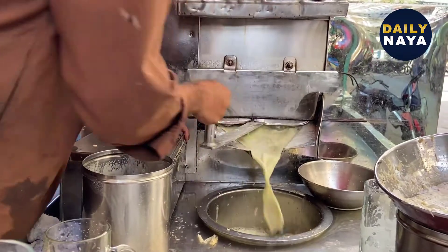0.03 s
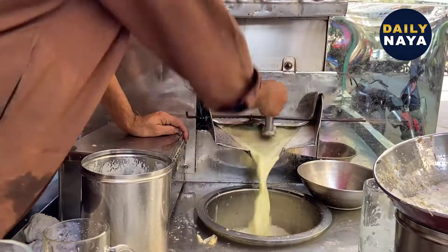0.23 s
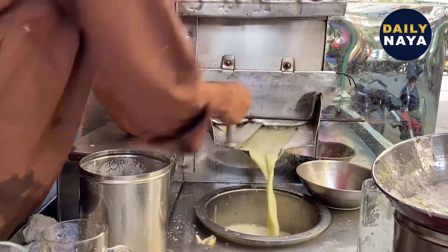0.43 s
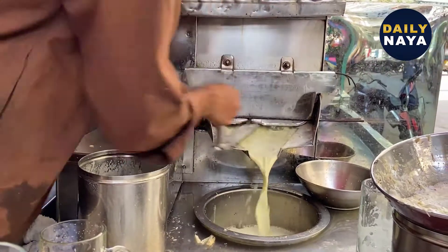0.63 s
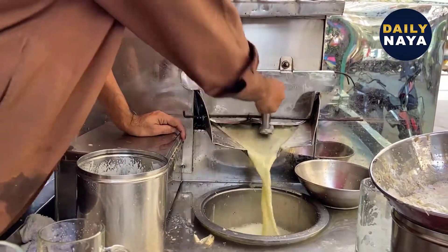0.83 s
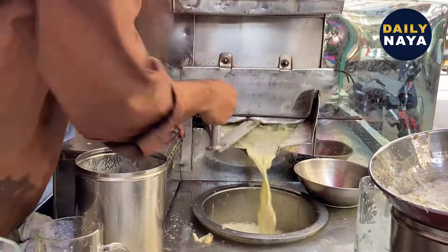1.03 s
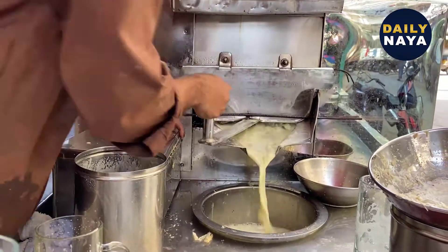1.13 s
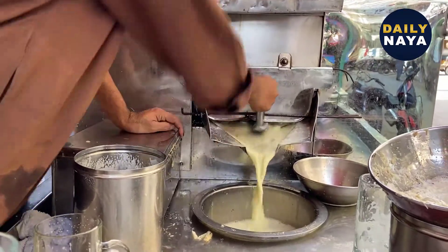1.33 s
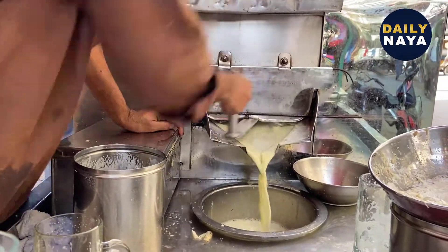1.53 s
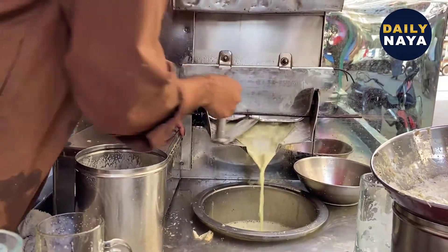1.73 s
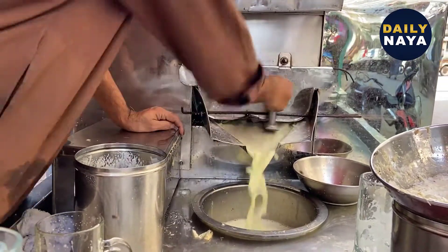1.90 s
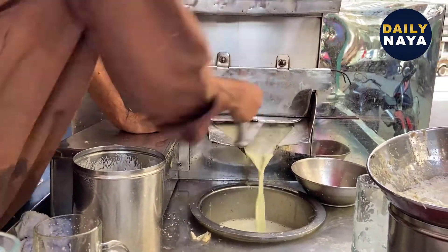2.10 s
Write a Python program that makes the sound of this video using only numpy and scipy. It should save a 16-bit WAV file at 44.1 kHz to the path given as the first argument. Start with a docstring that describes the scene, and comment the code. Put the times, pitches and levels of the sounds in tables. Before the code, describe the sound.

Metal scraping on a hollow sheet-metal tray, close and dry. A gritty rasp opens and fades by 0.1 s; a dull clunk at 0.23, a ringing crack at 0.6, faint squeaks to 0.9. At 1.11 a crack leads into the loudest, clipped clanging scrape near 1.16. Lighter scrapes and thin high whistles follow, a bright clank at 1.72, a squeak and booming thuds around 1.9, then fading rubs over low street murk.

```python
"""Street stall: a hand sweeps a metal scraper to and fro along the wet sheet-metal tray of a cane press. Dense
friction grains ring tray and scraper; coarser judders shake the hollow below into rumble and boom. Noise bursts
make knocks and clunks, single blows make catches and thuds, gliding tones squeak and whistle. Patchy band noise
is the murky street-and-machine floor. The loudest peaks clip."""
import sys
import numpy as np
from scipy import signal
from scipy.io import wavfile

SR = 44100
rng = np.random.default_rng(int(sys.argv[2]) if len(sys.argv) > 2 else 0)


def master(y):
    """Save y as 16-bit WAV."""
    cut = np.clip(np.atleast_2d(y).T, -1, 1)
    pcm = np.round(cut * 32767)  # scale
    wavfile.write(sys.argv[1], SR, pcm.astype(np.int16))


N = 95300

# shared resonances: (centre [Hz], width [Hz], relative gain [dB])
# scraper blade
SCRAPER_MODES = [(4652, 370, 1), (4930, 300, 6.5), (5277, 205, 5), (5560, 230, -2), (5860, 150, -25)]
# treble hiss
TREBLE_MODES = [(10490, 520, 0), (10830, 460, 0.5), (11620, 400, 5), (12050, 130, 4), (12350, 200, 5),
                (13500, 130, -16), (13520, 1300, 3), (14170, 510, 8), (14800, 450, 1), (15020, 360, 6)]
# drumming of the hollow under the tray
DRUMMING_MODES = [(280.7, 63, 6.5), (339, 28.5, 2.5), (402.4, 91, 2.5), (505, 115, -6)]
# low mids of the same hollow
LOW_MID_MODES = [(565.5, 124, 2.5), (672.7, 106, 5), (784, 83, 1), (839, 81, -3), (946, 127, -6)]
WANDER_DB, HOLLOW_WANDER_DB, WANDER_HZ = 2.2, 1.5, 15


def amp(db):
    """dB to gain."""
    return 10 ** (np.asarray(db) / 20)


def rms_one(x):
    """Scale to rms 1."""
    return x / np.sqrt(np.mean(x ** 2) + 1e-20)


def in_time(rows):
    """Interpolate the columns of a time table to every sample."""
    time_s, *columns = np.transpose(rows)
    return [np.interp(np.arange(N) / SR, time_s, column) for column in columns]


def drift(rate_hz):
    """Random drift of rms 1: noise low-passed near rate_hz by a double pole."""
    step = 40  # samples per drift point
    pole = np.exp(-2 * np.pi * rate_hz * step / SR)
    noise = rng.standard_normal(N // step + 2002)
    slow = signal.lfilter([1], [1, -2 * pole, pole * pole], noise)[2000:]  # settled part
    return np.interp(np.arange(N) / step, np.arange(len(slow)), rms_one(slow))


def resonate(x, hz, width_hz):
    """Two-pole resonance applied twice, for dark valleys between modes."""
    r = np.exp(-np.pi * width_hz / SR)
    poles = [1, -2 * r * np.cos(2 * np.pi * hz / SR), r * r]
    section = [(1 - r * r) / 2, 0, (r * r - 1) / 2, *poles]
    return signal.sosfilt([section, section], x + 1e-18)


def grains(per_s, spread_db):
    """Friction slips: randomly timed clicks of uneven size and either sign, rms 1."""
    sizes = amp(spread_db * np.minimum(rng.exponential(1, N), 5))
    signs = rng.choice([-1, 1], N)
    return rms_one(sizes * signs * (rng.random(N) < per_s / SR))


def ring_modes(source, modes):
    """Parallel resonances with alternating sign."""
    return [amp(db) * (-1) ** k * resonate(source, hz, width_hz)
            for k, (hz, width_hz, db) in enumerate(modes)]


def rubbed(source, level_db, modes, wander_db=WANDER_DB):
    """A source rings a set of modes, each taking a wandering share as the contact moves."""
    unlevelled = sum(ring_modes(source, modes))
    scale = np.sqrt(np.mean(unlevelled ** 2))
    parts = ring_modes(source * amp(level_db), modes)
    return sum(amp(wander_db * drift(WANDER_HZ)) * part for part in parts) / scale


def dying(events, t60_s):
    """Level [dB] of sudden blows, each falling 60 dB in t60_s; the loudest wins."""
    t = np.arange(N) / SR
    levels = [np.where(t >= s, db - 60 * (t - s) / t60_s, -200) for s, db in events]
    return np.max(levels, axis=0).clip(-200)


def struck(start_s, hz, width_hz, peak_db):
    """One resonance set ringing by a single blow."""
    click = np.zeros(N)
    click[int(start_s * SR)] = 1
    ring = resonate(click, hz, width_hz)
    return amp(peak_db) * ring / np.abs(ring).max()


def wavering_tone(hz, waver_hz):
    """Narrow-band noise: a carrier whose two quadratures drift independently."""
    phase = 2 * np.pi * np.cumsum(hz) / SR
    return drift(waver_hz) * np.cos(phase) + drift(waver_hz) * np.sin(phase)


def street():
    """Patchy far noise in half-octave bands, each drifting in level."""
    level_db, patchy_db, patchy_hz = -41, 4, 4.2
    # spectrum shape: (frequency [Hz], relative density [dB per Hz])
    spectrum = [(15, -52), (25, -28), (113, -0.5), (198, 5.5), (664, -12.5), (1050, -5), (1610, -11),
                (2110, -9.5), (3520, -12.5), (4990, -42), (6030, -6.5), (9260, -65), (12500, -43),
                (15400, -41)]
    hz, density_db = np.transpose(spectrum)
    edges_hz = 22 * 2 ** np.arange(0, 9.6, .5)
    white = rng.standard_normal((2, N))  # neighbouring bands use different noise
    out = 0
    for k, (low, high) in enumerate(zip(edges_hz, edges_hz[1:])):
        sos = signal.butter(2, [low, high], "band", fs=SR, output="sos")
        band = signal.sosfilt(sos, white[k % 2])
        band_db = np.interp(np.log(low * high) / 2, np.log(hz), density_db)
        out = out + band * amp(band_db + patchy_db * drift(patchy_hz))
    return amp(level_db) * rms_one(out)


def hollow():
    """Coarser judders shake the hollow under the tray."""
    judders_per_s, spread_db = 1200, 2
    # levels: (time [s], rumble [dB], boom [dB], drumming [dB], low mids [dB])
    levels = [(0.0, -29, -46, -24, -34), (0.042, -49, -29.5, -37, -35.5), (0.072, -39, -37, -45, -46),
              (0.118, -49, -71, -52, -52), (0.226, -41.5, -34.5, -28.5, -43), (0.326, -36, -32.5, -46, -40),
              (0.398, -46, -41, -39.5, -47), (0.47, -35, -45, -33.5, -46), (0.544, -41, -28.5, -48, -44),
              (0.602, -35.5, -17, -24.5, -28), (0.64, -32, -29, -36.5, -46), (0.674, -40, -59, -62, -53),
              (0.704, -45, -45, -57, -50), (0.756, -40, -29, -37.5, -48.5),
              (0.83, -29.5, -28.5, -39.5, -38.5), (0.884, -47, -49, -43, -40.5),
              (0.916, -40, -42.5, -38, -44), (0.936, -53, -59, -45, -48), (1.004, -51, -45, -44, -57),
              (1.032, -38, -30, -38, -48), (1.1, -40, -20.5, -37, -38), (1.12, -37, -13, -42, -28),
              (1.146, -36, -7.5, -15, -9), (1.164, -21, -14, -3, 2.5), (1.18, -24, -28, -32, -10),
              (1.198, -42, -36, -26, -19.5), (1.23, -45, -38, -51, -38), (1.25, -52, -48, -36.5, -50),
              (1.36, -33.5, -28.5, -33, -35.5), (1.406, -42, -30, -43, -38),
              (1.444, -31.5, -33, -33.5, -45), (1.518, -60, -40, -44.5, -40.5), (1.554, -37, -61, -49, -47),
              (1.582, -42.5, -48, -38.5, -40.5), (1.636, -43, -33.5, -40, -43.5),
              (1.716, -28.5, -27, -33, -23), (1.74, -37, -37.5, -28, -24.5),
              (1.796, -38, -29.5, -38.5, -44.5), (1.896, -28, -33.5, -22, -34.5),
              (1.936, -28, -17, -21.5, -22), (1.968, -22.5, -17.5, -24.5, -23),
              (2.04, -42, -39, -35.5, -36.5), (2.116, -40.5, -45, -30.5, -51), (2.16, -48, -46, -39, -38)]
    # rumble and boom resonances: (centre [Hz], width [Hz], relative gain [dB])
    rumble_modes = [(50, 105, -12.5), (75, 41, -5), (120.6, 47, -0.5)]
    boom_modes = [(147.4, 51, -3), (194.6, 54, 7), (251, 34, -5)]
    source = grains(judders_per_s, spread_db)
    mode_sets = [rumble_modes, boom_modes, DRUMMING_MODES, LOW_MID_MODES]
    return sum(rubbed(source, db, modes, HOLLOW_WANDER_DB)
               for db, modes in zip(in_time(levels), mode_sets))


def whistles():
    """Two long thin high whistles that waver in tone and level."""
    waver_hz, break_db, break_hz = 150, 2, 30
    # per whistle: (time [s], pitch [Hz])
    pitches = [
        [(.98, 12550), (1.07, 12400), (1.33, 12250), (1.41, 12500), (2.1, 12560)],
        [(1.6, 14500), (1.9, 14300)],
    ]
    # per whistle: (time [s], level before wavering [dB])
    levels = [
        [(.95, -69), (1.0, -45), (1.07, -36.5), (1.23, -31), (1.33, -33), (1.41, -28), (1.5, -51), (1.62, -60),
         (1.8, -61), (1.88, -43), (1.95, -34.5), (2.05, -38.5), (2.1, -51)],
        [(1.25, -75), (1.38, -42), (1.5, -38), (1.62, -44), (1.85, -39.5), (2.0, -39), (2.1, -60)],
    ]
    out = 0
    for pitch, level in zip(pitches, levels):
        hz, db = in_time(pitch)[0], in_time(level)[0]
        db = db + break_db * drift(break_hz)
        out = out + amp(db) * wavering_tone(hz, waver_hz)
    return out


def squeaks():
    """Short gliding slips: a steady tone blended with a wavering one by roughness."""
    waver_hz = 90
    # slips: (start [s], length [s], start pitch [Hz], end pitch [Hz], roughness [0-1], nominal level [dB])
    slips = [(0.298, 0.064, 2960, 3180, .65, -44), (0.706, 0.057, 3250, 3250, .75, -45),
             (0.806, 0.058, 3170, 3120, .5, -40), (0.857, 0.066, 2700, 2620, .3, -35.5),
             (1.895, 0.024, 4436, 4436, .5, -25), (2.126, 0.037, 3135, 3135, .6, -41)]
    t, out = np.arange(N) / SR, 0
    for start_s, length_s, start_hz, end_hz, rough, db in slips:
        along = np.clip((t - start_s) / length_s, 0, 1)
        hz = start_hz + (end_hz - start_hz) * along
        steady = np.cos(2 * np.pi * np.cumsum(hz) / SR)
        tone = (1 - rough) * steady + rough * wavering_tone(hz, waver_hz)
        swell = np.sqrt(np.abs(np.sin(np.pi * along))) * (along < 1)
        out = out + amp(db) * swell * tone
    return out


def thuds():
    """Low blows set two boom resonances throbbing."""
    low_hz, upper_hz, width_hz, upper_db = 210, 328, 60, -4
    # blows: (time [s], peak of the low resonance [dB])
    blows = [(1.906, -11.5), (1.924, -10), (1.943, -14.5), (1.968, -11.5)]
    return sum(struck(s, low_hz, width_hz, db) + struck(s, upper_hz, width_hz, db + upper_db)
               for s, db in blows)


def catches():
    """Single blows each ring one resonance: the scraper snags and a tray or scraper resonance rings out, and
    two dull clunks give the hollow a brief pitched ring."""
    width_at_1600_hz = 113
    # clunks and snags: (time [s], pitch [Hz], peak [dB])
    rings = [(.181, 394, -24), (.231, 494, -19), (0.57, 1620, -5.5), (0.602, 1577, -2.5), (0.612, 1605, -4),
             (0.629, 1270, -10.5), (1.7225, 4730, -1)]
    return sum(struck(s, hz, width_at_1600_hz * np.sqrt(hz / 1600), db) for s, hz, db in rings)


def knocks():
    """Decaying noise: bright cracks ring scraper and treble, dull clunks ring the hollow."""
    crack_t60_s, clunk_t60_s = 0.03, 0.13
    scraper_db, treble_db = -18, -16.5
    # scraper knocking on the tray: (time [s], starting level before the two offsets above [dB])
    cracks = [(0.23, -10.5), (0.6015, 4), (0.813, -6), (1.1115, 7.5), (1.7221, 4.5)]
    # dull clunks on the tray: (time [s], starting level [dB])
    clunks = [(.18, -33.5), (.229, -21.5), (1.275, -25.5)]
    noise = rng.standard_normal(N)
    crack_db = dying(cracks, crack_t60_s)
    clunk_modes = DRUMMING_MODES[1:] + LOW_MID_MODES[:2]
    return (rubbed(noise, crack_db + scraper_db, SCRAPER_MODES)
            + rubbed(noise, crack_db + treble_db, TREBLE_MODES)
            + rubbed(noise, dying(clunks, clunk_t60_s), clunk_modes, HOLLOW_WANDER_DB))


def scrape():
    """One stream of chattering friction grains rings tray, scraper, grit and treble."""
    grains_per_s, spread_db, chatter_db, chatter_hz = 5000, 2, 1.5, 120
    # strokes: (time [s], tray ring [dB], then relative to it: lower tray [dB], upper tray [dB],
    # lower scraper [dB], scraper [dB], grit [dB], treble hiss [dB])
    strokes = [(0.0, -17, 2, -8, -16, 0, -15, -5), (0.032, -15, -4, -2.5, -1, -1.5, -11, 3),
               (0.05, -14, -3, -3.5, -6, -0.5, -14.5, -5.5), (0.08, -36, 1, -4, 0, -5, -13, 0),
               (0.102, -50, 1, -17, -26, 0, -25, -1), (0.16, -26.5, -13, -14, -19, -5.5, -29, -9),
               (0.218, -30, 2, -19, -20, -11.5, -20, -17), (0.23, -23, -4, -37, -37, -3, -23, -2),
               (0.29, -38.5, -6, -5, -15, -2.5, -23, -5), (0.318, -38.5, -20, -14, -12, -10, -28, -15),
               (0.4, -53.5, 3, -25, -14, -4, -31, -7), (0.49, -33.5, -25, -9, -17, -12, -24, -10),
               (0.536, -30.5, 0.5, -2, -15, 6.5, -12, 4.5), (0.576, -17, -13, -2.5, -15, -1.5, -11, -8),
               (0.588, -26.5, -14, -4, 3.5, 5.5, -1.5, 7), (0.61, -13, -9, -0.5, -4, -7.5, -8, -2),
               (0.634, -22, -3, -4.5, -6, -4, -18, -10.5), (0.666, -40.5, -26, 2.5, -6, -3, -15, -6),
               (0.692, -35, -22, -20, -28, -7, -28, -12), (0.73, -31, -5, -2.5, -14, -0.5, -18, -5),
               (0.776, -35.5, 2, -4, -11, 5, -36, -12), (0.822, -35, -4, -2, -6.5, 2.5, -26, -4),
               (0.87, -34.5, -25, -7.5, -15, -14, -28, -17), (0.888, -31.5, -24, -23, -33, -16, -34, -18),
               (0.918, -55.5, -5, -1, 6, -2, -6, 0), (0.992, -60, 4, -10, -13, 2, -14, 2),
               (1.064, -32.5, -2, -7, -13, -6.5, -18, -9), (1.09, -31.5, 2.5, 1, -3, 4, -6, 7),
               (1.117, -23, -0.5, -1.5, 1, 7, -5.5, 7), (1.151, 3, -9, -2, -7.5, -3, -6, -4),
               (1.167, 2.5, 9, -1, -3, -18, -10, -1.5), (1.181, -8.5, -4, -6.5, -9, -8.5, -13, -8),
               (1.199, -32.5, 4, 2, -0.5, 0, -2, 4), (1.215, -43, -6, 4, 2, 3, 3, 6),
               (1.23, -42, -6, -2, -9, 2.5, -7, 9), (1.284, -15, -9.5, -9, -14, -6, -18.5, -5.5),
               (1.306, -23.5, -9, -9, -15, -10, -19, -13), (1.332, -35.5, -19, 2, -28, 0.5, -23, -4),
               (1.348, -22, -11, -7.5, -26, -5, -31, -8), (1.384, -27.5, -18, -5, -15, -0.5, -28, -6),
               (1.416, -21, -19, -12.5, -23, -17, -26, -11), (1.462, -29.5, -15, -9.5, -45, -16, -50, -32),
               (1.504, -46, -5, -6.5, -23, -6, -25, 0), (1.628, -33.5, -23, -1.5, -27, -5.5, -27, -10.5),
               (1.692, -14, -9.5, -1.5, -11, -4.5, -19.5, -10),
               (1.745, -13.5, -15, 0.5, -2.5, -0.5, -6, -8.5), (1.766, -31, -6, 8.5, -3, -5, -11, -4),
               (1.812, -35.5, -19, 3, -11, -10, -18, -28), (1.836, -28.5, -19, 0, -25, -2, -30, -20),
               (1.856, -29, -29, 6.5, -18, -4.5, -25, -15), (1.9, -33, -10, 8.5, -4, 4.5, -28, -15),
               (1.934, -20.5, -7.5, -1, -8, -4, -43, -10), (1.998, -24, -18, -13.5, -33, -25, -37, -33),
               (2.04, -23, -41, -11.5, -28, -12, -53, -36), (2.082, -39, -24, -13, -3, -4, -30, -10),
               (2.102, -47, -2, 0, -11, 0, -14, -16), (2.126, -36, -10, -9, -18, -17, -22, -10),
               (2.148, -34.5, 3, 1, -17, -3, -16, 3.5), (2.16, -34, -8, -15, -24, -12, -17, -7)]
    # tray, lower scraper and grit resonances: (centre [Hz], width [Hz], relative gain [dB])
    tray_modes = [(1502, 310, -7), (1622, 160, 0), (1736, 80, -5.5), (1875, 212, -8)]
    tray_lower_modes = [(1068, 370, -12), (1259, 147, 4), (1417, 186, 1.5)]
    tray_upper_modes = [(2076, 224, 10.5), (2280, 330, 14), (2607, 324, 9.5), (2860, 36, -9)]
    scraper_lower_modes = [(3223, 620, -9), (3833, 236, -6), (4110, 215, -3.5), (4462, 290, 3)]
    grit_modes = [(6040, 970, 6.5), (7050, 480, -6.5), (7240, 450, -1.5), (8450, 380, -20.5),
                  (9770, 440, 3.5)]
    tray_db, *offsets_db = in_time(strokes)
    source = grains(grains_per_s, spread_db) * amp(chatter_db * drift(chatter_hz))
    mode_sets = [tray_lower_modes, tray_upper_modes, scraper_lower_modes,
                 SCRAPER_MODES, grit_modes, TREBLE_MODES]
    out = rubbed(source, tray_db, tray_modes)
    for offset_db, modes in zip(offsets_db, mode_sets):
        out = out + rubbed(source, tray_db + offset_db, modes)
    return out


def scene():
    """All sources at one microphone."""
    background = street() + hollow()
    tones = whistles() + squeaks()
    blows = thuds() + catches() + knocks()
    return (background + tones + blows + scrape())[None]


def record(dry):
    """Hard clipping of the loudest peaks, then a steep low-pass."""
    clip_level, cutoff_hz = .93, 15630
    low_pass = signal.ellip(12, .5, 65, cutoff_hz, fs=SR, output="sos")  # ripple dB, stop-band dB
    return signal.sosfilt(low_pass, np.clip(dry, -clip_level, clip_level))


dry = scene()
out = record(dry)
master(out)
```